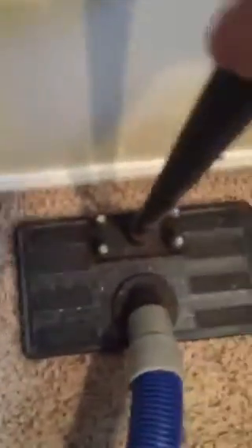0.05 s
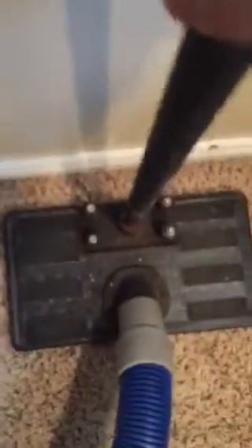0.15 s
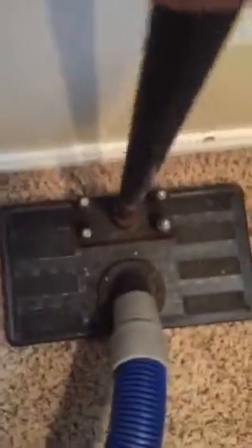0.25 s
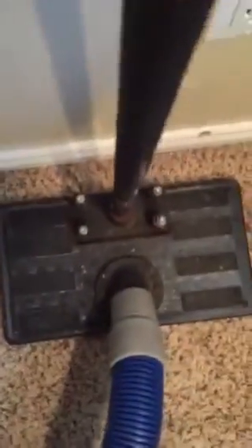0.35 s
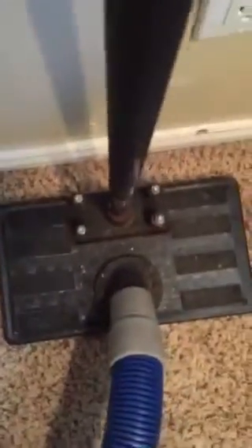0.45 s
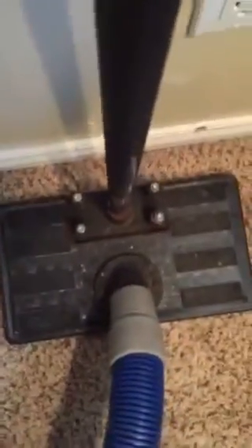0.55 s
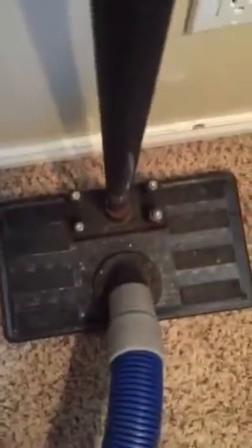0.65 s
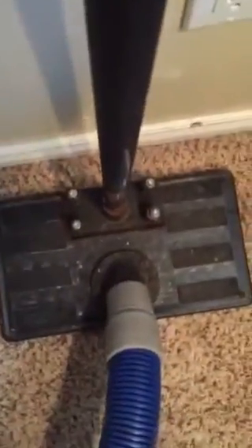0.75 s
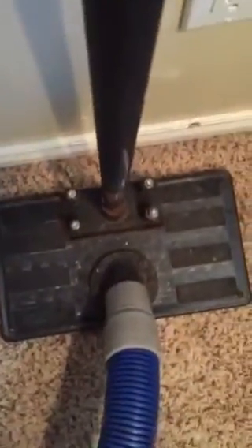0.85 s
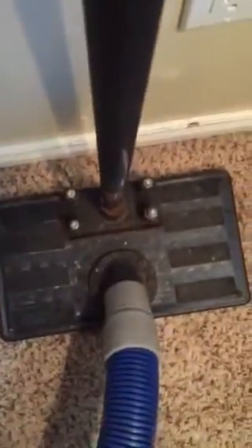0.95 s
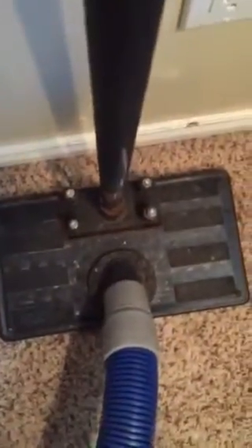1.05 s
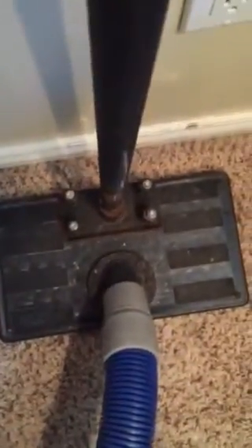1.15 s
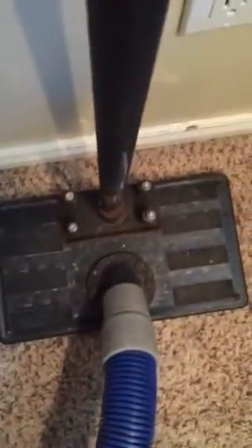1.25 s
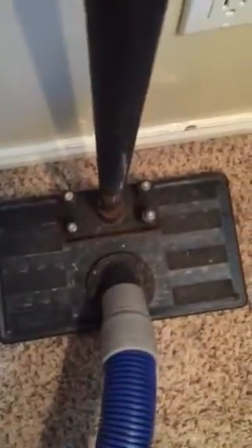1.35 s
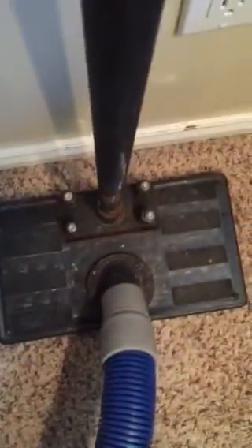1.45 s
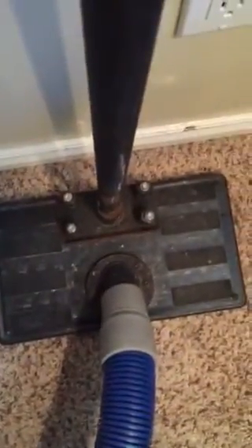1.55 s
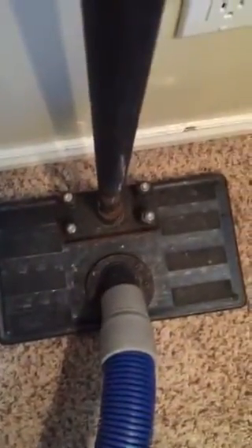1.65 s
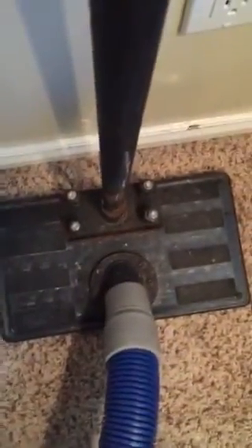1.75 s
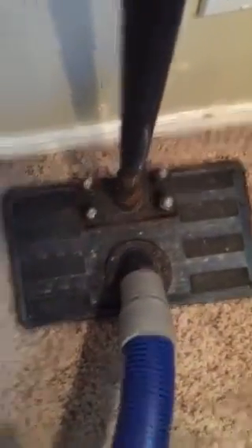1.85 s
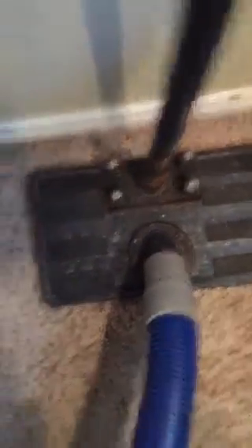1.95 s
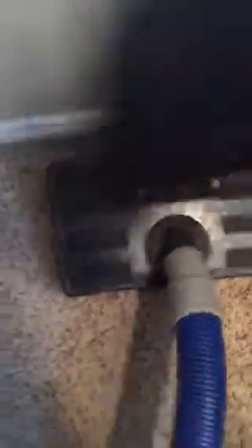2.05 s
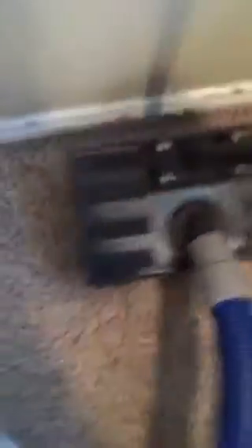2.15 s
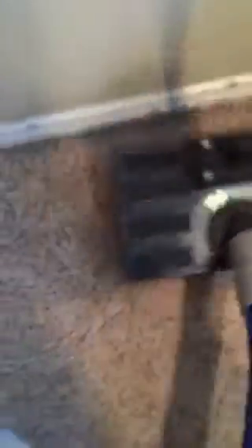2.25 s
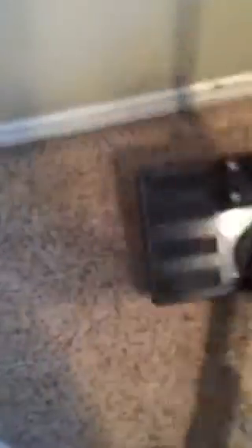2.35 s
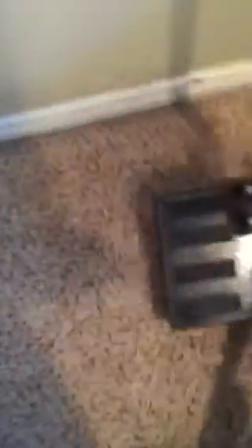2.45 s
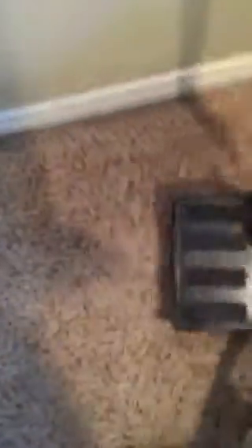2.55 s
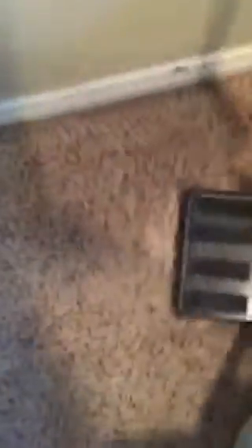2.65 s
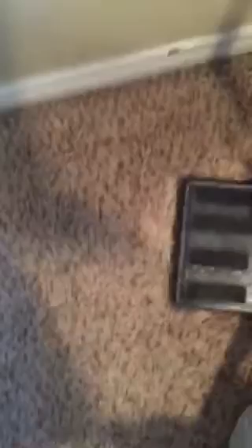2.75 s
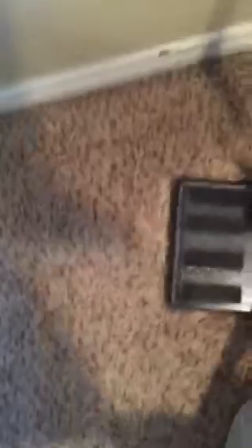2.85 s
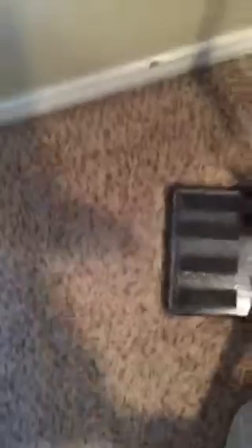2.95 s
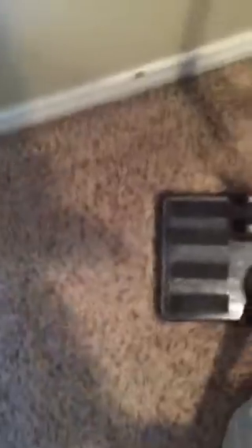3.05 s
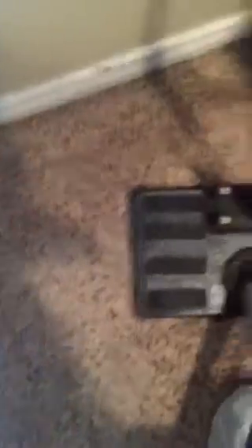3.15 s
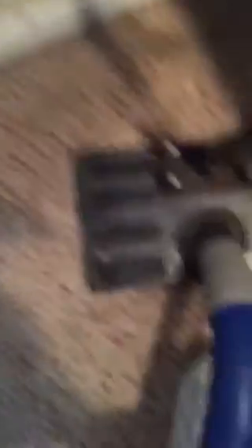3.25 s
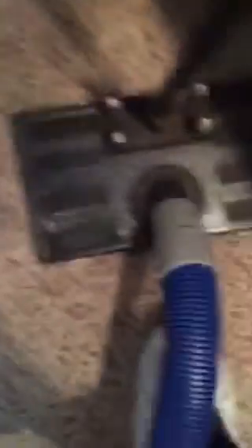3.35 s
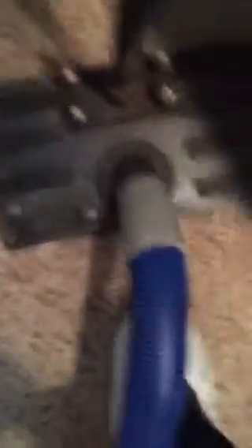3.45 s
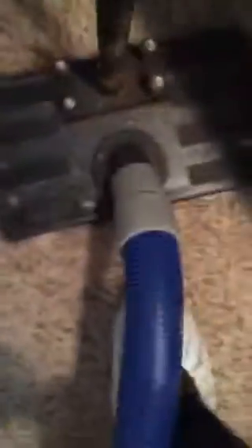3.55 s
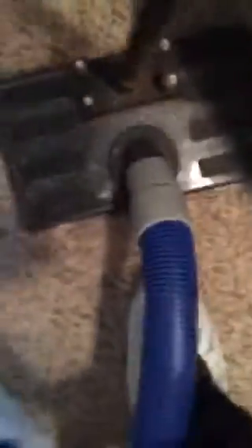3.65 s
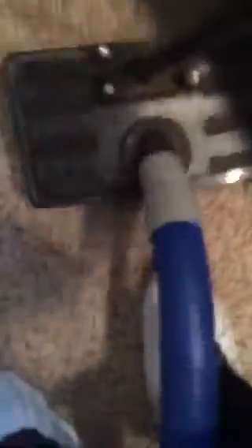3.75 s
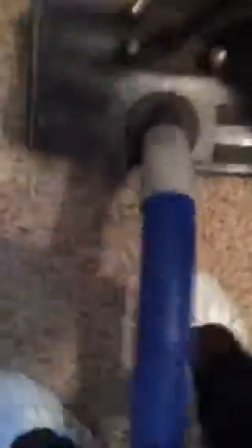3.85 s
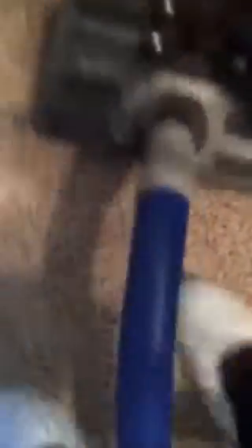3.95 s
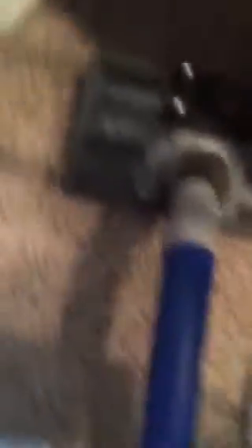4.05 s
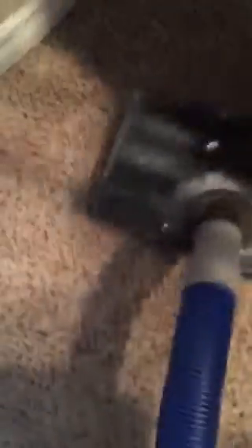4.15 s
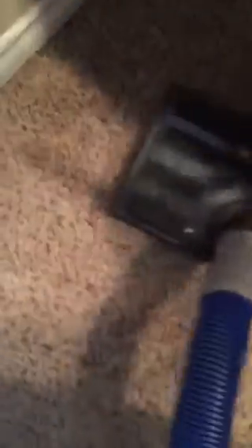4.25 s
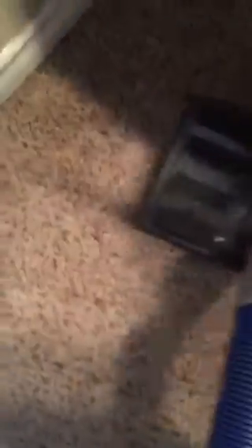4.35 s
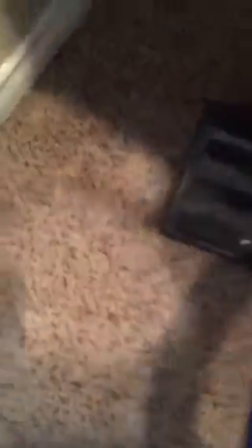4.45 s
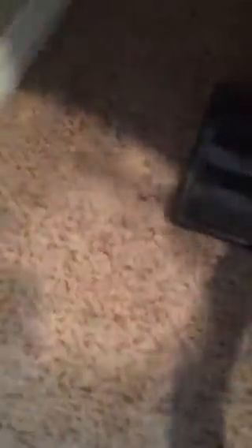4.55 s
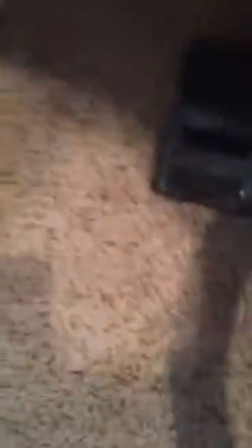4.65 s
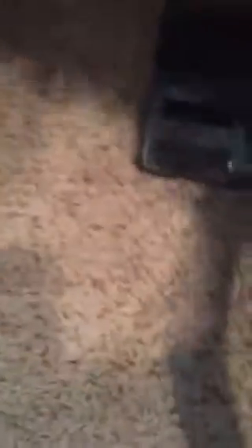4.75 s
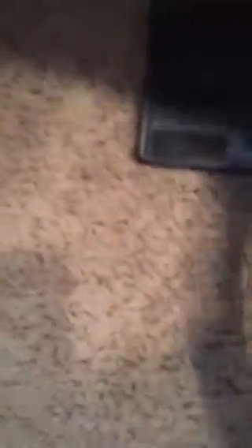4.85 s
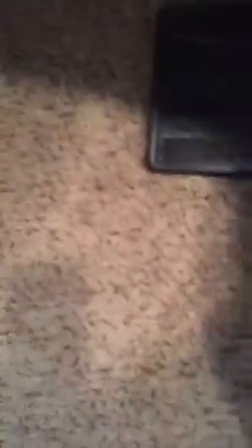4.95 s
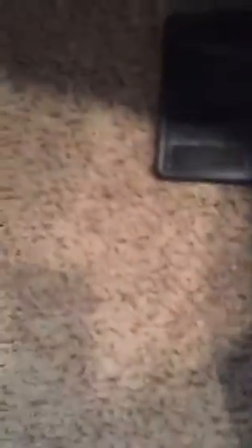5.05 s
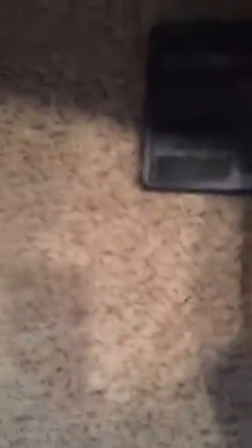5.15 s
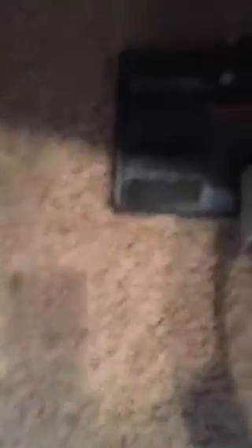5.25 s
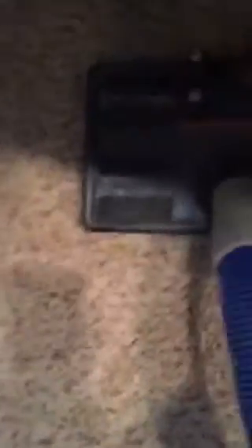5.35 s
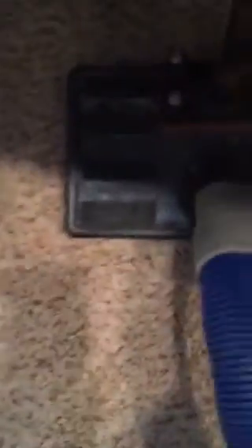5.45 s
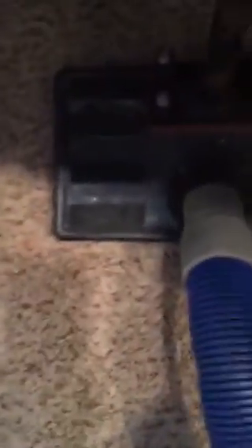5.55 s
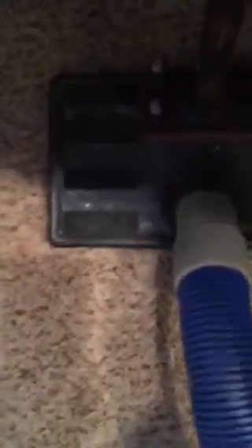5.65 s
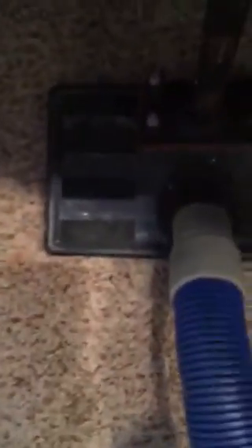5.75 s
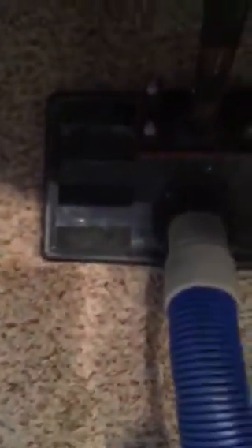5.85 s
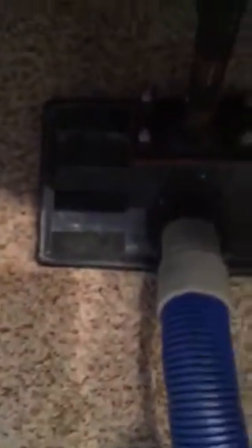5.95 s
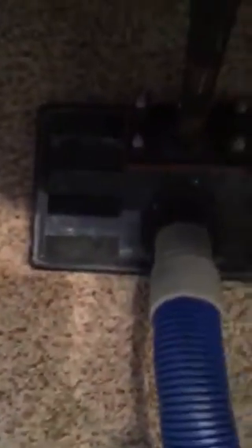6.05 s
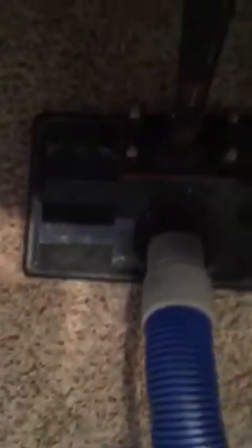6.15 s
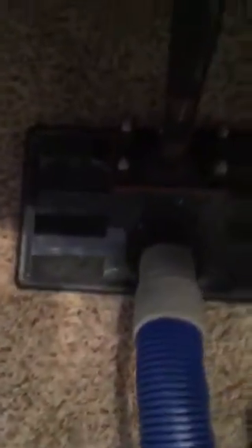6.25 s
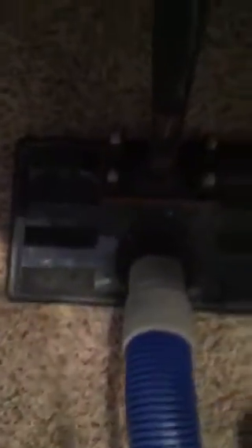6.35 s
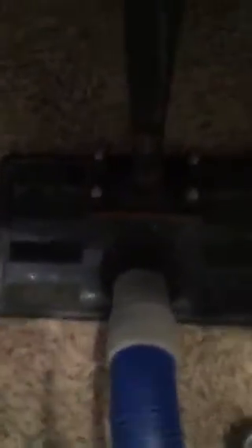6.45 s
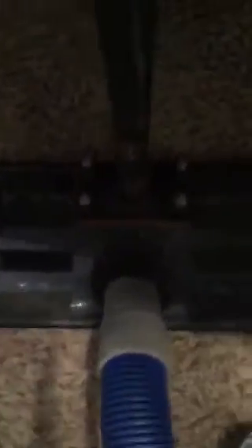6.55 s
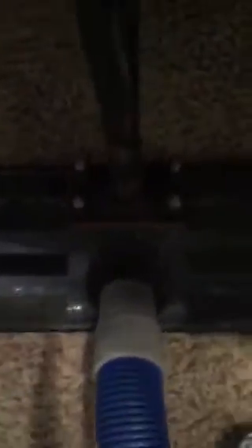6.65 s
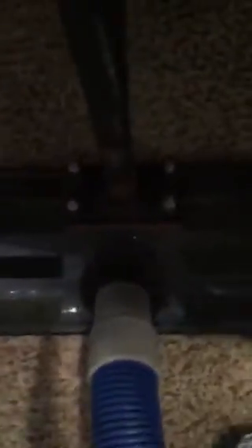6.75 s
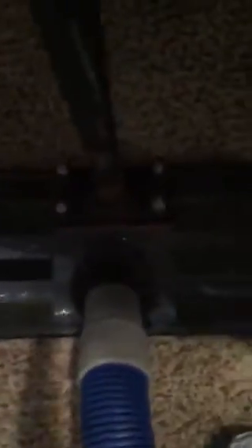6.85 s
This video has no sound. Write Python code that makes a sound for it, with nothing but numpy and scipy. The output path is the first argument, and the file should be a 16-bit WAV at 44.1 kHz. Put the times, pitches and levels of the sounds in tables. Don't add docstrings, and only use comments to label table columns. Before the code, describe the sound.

Close airy suction hiss on wet carpet, two sudden rushes of loud roaring air with plate knocks, each followed by a short rumbling, leaking slide.

```python
import sys
import numpy as np
from scipy import signal
from scipy.fft import rfft, irfft
from scipy.io import wavfile
from scipy.ndimage import uniform_filter1d

SR = 44100
rng = np.random.default_rng(int(sys.argv[2]) if len(sys.argv) > 2 else 0)


def to_wav(sig):
    pcm = np.clip(np.atleast_2d(sig), -1, 1) * 32767
    pcm = np.round(pcm).astype(np.int16)
    wavfile.write(sys.argv[1], SR, pcm.T)


def nominal_scale(level):
    x = np.asarray(level, float) / 20
    return 10 ** x


N = 305172
T = np.arange(N) / SR


def evened(x):
    return x / np.sqrt(np.mean(x ** 2) + 1e-20)


def read(points, hz):
    f, value = np.transpose(points)
    return np.interp(np.log(hz + 1), np.log(f + 1), value)


def bump(hz, centre_hz, width_hz):
    return 1 / (1 + (2 * (hz - centre_hz) / width_hz) ** 2)


def drift(hz, t, count=24):
    rates = np.geomspace(hz / 20, hz, count)
    return evened(sum(np.sin(2 * np.pi * (f * t + rng.random())) / np.sqrt(f) for f in rates))


def air(field_db, size, patchy_db, gust_db, gust_hz):
    overlap = size * 3 // 4
    hz, t, z = signal.stft(rng.standard_normal(N), SR, nperseg=size, noverlap=overlap)
    patches = uniform_filter1d(rng.standard_normal(z.shape), max(round(500 / hz[1]), 1), 0)
    patches = evened(uniform_filter1d(patches, round(.07 / t[1]), 1))
    z = z * nominal_scale(field_db(hz, t) + patchy_db * patches + gust_db * drift(gust_hz, t))
    return signal.istft(z, SR, nperseg=size, noverlap=overlap)[1][:N]


def edged(s, levels, open_s, shut_s):
    levels, drop_db = np.array(levels), -19.5
    times = np.r_[s[0] - abs(open_s), s, s[-1] + abs(shut_s)]
    return times, np.c_[levels[:, :1] + drop_db, levels, levels[:, -1:] + drop_db]


def banded(strokes, spectra, bands):
    def field_db(hz, t):
        out = np.full((len(hz), len(t)), -120.)
        centres = np.log([lo * hi for lo, hi in bands]) / 2
        weights = np.array([np.interp(np.log(hz + 1), centres, one) for one in np.eye(len(bands))])
        for (s, levels), spectrum in zip(strokes, spectra):
            shape = read(spectrum, hz)
            power = nominal_scale(2 * shape)
            held = [10 * np.log10(np.mean(power * (hz >= lo) * (hz < hi))) for lo, hi in bands]
            on = (t >= s[0]) & (t <= s[-1])
            gains = np.array([np.interp(t[on], s, v) - h for v, h in zip(levels, held)])
            out[:, on] = shape[:, None] + weights.T @ gains
        return out
    return field_db


def resonate(x, hz, width_hz):
    turn = np.exp(2j * np.pi * np.cumsum(hz) / SR)
    r = np.exp(-np.pi * width_hz / SR)
    return (turn * signal.lfilter([1], np.convolve([1, -r], [1, -r]), x / turn)).real


def seal():
    # f/Hz, level/dB per Hz
    first_hiss = [(24, -44), (40, -43), (60, -7), (132, -10.5), (446, -20.5), (492, -16), (1750, -14.5),
                  (2030, -8), (2880, -15), (6210, -17), (7970, -22.5), (11600, -15), (15200, -28.5)]
    last_hiss = [(24, -54), (40, -29), (53, -8), (74, -16), (98, -14.5), (258, -25), (315, -15.5),
                 (505, -19), (1180, -15), (1330, -14.5), (3260, -15), (4730, -9), (15200, -22.5)]
    # f/Hz, width/Hz, boost/dB
    first_slots = [(1200, 220, 1), (2050, 140, 4.5), (3200, 110, 8), (4030, 200, 2.5), (4230, 100, -3.5),
                   (4480, 560, 8), (5280, 420, 6.5), (6220, 500, 7), (11700, 530, 5.5), (762, 110, -8),
                   (2900, 260, -5.5), (7500, 710, -3), (9400, 940, -1), (12600, 600, -7)]
    last_slots = [(1176, 190, 8), (1580, 81, 5.5), (2160, 220, 4), (4710, 260, 4), (4100, 200, 4),
                  (5270, 250, 4.5), (6440, 520, 5), (795, 270, -2.5), (12500, 1500, 0.5)]
    seal_db = -35.5, -34.5
    # t/s, share of the last place
    place = [
        (0, 0.3),
        (2.1, 0.27),
        (2.7, 0.83),
        (6.92, 0.77),
    ]
    # t/s, treble loss/dB, recovery/s
    dips = [
        (2.75, -6, .2),
        (4.93, -1, .25),
    ]
    ripple_db, ripple_hz, ripple_top_hz = 1.7, 65, 8000

    def field_db(hz, t):
        places = []
        for spectrum, slots, db in zip((first_hiss, last_hiss), (first_slots, last_slots), seal_db):
            shape = read(spectrum, hz) + sum(boost * bump(hz, f, w) for f, w, boost in slots)
            ripple = evened(uniform_filter1d(rng.standard_normal(len(hz)), round(ripple_hz / hz[1])))
            shape = shape + ripple_db * (hz > 300) / (1 + (hz / ripple_top_hz) ** 4) * ripple
            places.append(shape + db - 10 * np.log10(np.mean(nominal_scale(2 * shape) * (hz > 300))))
        share = np.interp(t, *np.transpose(place))
        dip = sum(db * (t > s) * np.exp(-abs(t - s) / back) for s, db, back in dips)
        treble = hz ** 2 / (hz ** 2 + 6600.0 ** 2)
        return np.outer(treble, dip) + np.outer(places[0], 1 - share) + np.outer(places[1], share)
    return air(field_db, size=2048, patchy_db=0.97, gust_db=0.26, gust_hz=11)


def machine():
    # f/Hz, level at the first place/dB, level at the last place/dB
    hum = [(57, -64, -63), (74.1, -50.5, -51.5), (91, -71, -101), (114, -65, -63.5), (119.8, -55.5, -72),
           (136.8, -49, -63.5), (222, -64.5, -68.5)]
    # t/s, share of the last place, level/dB
    standing = [(0, 0.065, -1), (1.9, 0.02, 0), (2.8, 0.26, 0.5), (3.5, 0.28, 1.5), (4.0, 0.066, -2.5),
                (4.6, 0.15, -6), (5.2, 0.041, -3.5), (5.6, 0.49, 1), (6.0, 0.94, 2), (6.92, 1, 0)]
    s, *columns = np.transpose(standing)
    share, room_db = (np.interp(T, s, c) for c in columns)
    out = np.zeros(N)
    for hz, first_db, last_db in hum:
        waver, wander = (np.interp(T, T[::256], drift(f, T[::256])) for f in (9, 5))
        turns = np.cumsum(hz * (1 + .002 * wander)) / SR + rng.random()
        level_db = first_db + (last_db - first_db) * share + room_db + 0.77 * waver
        out += np.sqrt(2) * nominal_scale(level_db) * np.sin(2 * np.pi * turns)
    return out


def knocks():
    # t/s, peak level/dB, f/Hz, t60/s, sign and strength of the push
    hits = [(2.014, -30, 190, 0.041, 0.87), (2.0295, -19.5, 189, 0.028, 0.93),
            (2.042, -28, 190, .04, -0.95), (2.064, -13, 6100, .004, 1), (2.833, -24, 2400, .004, 1),
            (2.095, -25.5, 150, 0.087, 1), (2.743, -19.5, 1020, 0.037, 0.86), (2.742, -16, 2270, .025, 1),
            (2.751, -12.5, 198, .04, -0.9), (2.7565, -18, 185, 0.023, -0.92), (2.745, -20, 1500, .03, 1),
            (2.752, -21.5, 60, 0.1, -0.95), (2.884, -21, 1450, 0.016, 0.88), (3.656, -20, 165, .05, 0.47),
            (3.721, -16.5, 1410, .012, 1), (3.761, -22, 213, 0.082, 1), (3.781, -28, 65.4, 0.086, 0.92),
            (4.595, -28, 240, 0.16, 0.56), (4.676, -31.5, 61, .15, 1), (4.89, -36, 50, 0.15, 1),
            (4.99, -37, 47.6, .15, 1), (5.052, -28.5, 229, 0.18, 0.6)]
    out, t = np.zeros(N), T[:SR // 4]
    for s, db, hz, t60, sign in hits:
        swing = (1 - np.exp(-3. * hz * t)) * nominal_scale(-60 * t / t60) * np.sin(2 * np.pi * hz * t)
        out[round(s * SR):][:len(t)] += sign * nominal_scale(db) * swing / abs(swing).max()
    return out


def rush():
    # t/s, flow level/dB, lift 0-1, tightness of the jet at the lip 0-1, wetness 0-1
    tears = [
        [(2.05, -38, .6, 0.68, .5), (2.062, -36, 0.74, .8, 0.84), (2.09, -24.5, 0.62, 0.14, 0.65),
         (2.132, -24.5, 0.85, 0.4, 0.8), (2.21, -31, 0.94, 0.8, 0.47), (2.444, -31.5, 0.91, 0.74, 0.45),
         (2.69, -29, 0.76, 0.46, 0.5), (2.72, -22.5, .1, 0, 0.5), (2.748, -24, 0.3, 0.33, 0.15)],
        [(3.712, -25.5, 0.06, 0.94, 0.4), (3.75, -25.5, .3, 0.74, 0.66), (3.766, -21, 0.37, .3, 0.52),
         (3.89, -26, 0.66, 0.64, 0.65), (4.3, -28, 0.76, 0.47, 0.8), (4.59, -24.5, 0.44, 0.21, 0.76),
         (4.7, -22.5, 0.13, 0.04, .3), (4.866, -24, 0.13, 0.25, 0.3), (4.932, -29.5, 0.4, .25, 0)],
    ]
    # f/Hz, level/dB per Hz
    roar = [
        [(24, -65), (40, -35), (60, -34), (135, -4.5), (517, -7), (631, -4.5), (1200, -9), (1430, -8.5), (1930, -7.5), (3340, -8), (5090, -11.5), (12200, -8), (15200, -10.5)],
        [(24, -50), (40, -20), (64, -15), (93, -16), (228, 1.5), (365, -9.5), (544, -2), (697, -2.5), (1150, -2.5), (2670, -1.5), (4850, -7), (11900, -6), (15200, -9)],
    ]
    # from f/Hz, to f/Hz
    bands = (150, 1200), (1200, 4000), (4000, 8000), (8000, 15500)
    # level when low, loose and dry/dB, then dB per lift, per tightness, per wetness
    law = [
        (-14, 15.5, 0.3, 0.1),
        (-10, 0, 20.3, 0.1),
        (-20, 8.2, 18.4, 11.6),
    ]
    # opening/s, shutting/s
    edge_times = [(0.029, 0.017), (0.019, 0.039)]
    # start t/s, end t/s, f/Hz, width/Hz, level/dB
    hollows = [(4.58, 5.0, 390, 80, -18), (4.3, 4.75, 550, 50, -7), (3.95, 4.5, 1150, 140, -5),
               (3.69, 3.77, 710, 400, -6), (4.85, 5.0, 750, 100, -5), (2.2, 2.48, 1230, 180, -6)]
    fade_s = .04
    strokes = []
    for rows, edges in zip(tears, edge_times):
        s, flow, lift, jet, wet = np.transpose(rows)
        boom, hiss, fizz = (flow + db + a * lift + b * jet + c * wet for db, a, b, c in law)
        strokes.append(edged(s, [boom, flow, hiss, fizz], *edges))
    roar_db = banded(strokes, roar, bands)

    def field_db(hz, t):
        out = roar_db(hz, t)
        for start, end, f, width, db in hollows:
            fade = np.clip(np.minimum(t - start, end - t) / fade_s, 0, 1)
            out = out + db * np.outer(bump(hz, f, width), fade)
        return out
    return air(field_db, size=1024, patchy_db=1.3, gust_db=.3, gust_hz=150)


def whistles():
    # start t/s, length/s, from f/Hz, to f/Hz, peak level/dB
    cracks = [(2.049, .04, 6200, 5800, -24.5), (3.703, .056, 4630, 4550, -18.5),
              (3.706, .058, 6100, 5840, -20.5), (3.711, .018, 3550, 3470, -19)]
    opening = [(2.1, 0.11, 1070, 1070, -27), (2.07, .12, 700, 620, -29.5), (2.13, 0.076, 620, 640, -31),
               (2.09, 0.116, 400, 370, -33.5), (2.15, 0.13, 950, 980, -33), (2.1, 0.28, 12000, 11500, -28),
               (2.08, 0.38, 14800, 11900, -19), (3.748, .06, 1650, 1300, -23.5),
               (3.77, .075, 1300, 920, -24), (3.82, .14, 910, 820, -24), (3.8, .11, 1500, 1700, -33),
               (4.45, 0.81, 237, 217, -43.5), (4.45, 0.45, 320, 300, -45.5)]
    closing = [(2.28, .48, 650, 643, -35), (2.44, .33, 1420, 1460, -34.5), (2.25, .3, 2070, 2100, -39),
               (2.62, 0.16, 2450, 2610, -32.5), (3.9, 0.83, 890, 910, -36.5), (4.15, 0.4, 1590, 1900, -33),
               (4.62, 0.28, 2280, 2600, -32), (4.66, 0.23, 3100, 3300, -33), (4.6, 0.29, 1050, 1090, -38),
               (4.55, .38, 4000, 4050, -31), (4.2, 0.52, 488, 480, -39.5), (5.05, 0.85, 224, 240, -55),
               (5.0, 1.24, 306, 311, -58.5)]
    leaks = [(2.89, .1, 5050, 5250, -39), (3.6, .17, 5080, 5230, -35), (3.02, .1, 4380, 4520, -35),
             (3.03, .1, 4300, 4700, -39), (3.13, .12, 4700, 4650, -38), (3.24, .08, 4600, 4640, -33),
             (3.28, .08, 3900, 4400, -38), (3.29, .11, 4450, 4300, -33.5), (3.33, .09, 4200, 4020, -39),
             (3.18, .12, 5050, 5400, -40), (3.4, 0.081, 5080, 4500, -39), (3.43, .09, 4400, 4640, -36),
             (3.4, .07, 6250, 6270, -37), (3.49, .05, 6130, 6120, -39), (3.56, .05, 6800, 6160, -40),
             (3.58, .12, 4300, 4480, -39), (3.05, .12, 6050, 6100, -43), (3.3, .07, 5450, 5470, -44),
             (3.5, 0.18, 4300, 4100, -43), (3.2, 0.17, 6300, 6240, -39), (3.33, .35, 6300, 6100, -43),
             (2.9, .15, 6000, 5150, -44), (4, .17, 4600, 5480, -42), (2.95, .24, 4100, 3800, -41),
             (3.17, .12, 3400, 3920, -44), (2.98, 0.22, 6000, 6100, -44), (2.95, 0.32, 7400, 7800, -47),
             (2.9, .27, 6900, 6500, -50), (4.96, .12, 4550, 4500, -40), (5.04, .11, 4800, 4800, -38),
             (5.07, .08, 4150, 4150, -42), (5.17, .16, 5400, 5150, -38), (5.26, .13, 4520, 4380, -38),
             (5.14, .1, 4750, 4600, -41), (5.23, .2, 6200, 6200, -42)]
    squeak = [(2.831, .021, 1530, 1480, -26.5), (2.839, .02, 2960, 2900, -35),
              (2.859, 0.0072, 2900, 2900, -38)]
    hose = [(3.781, .11, 612, 570, -27), (3.898, 0.076, 641, 620, -32.5), (3.98, .12, 608, 593, -30.5),
            (4.13, .1, 710, 700, -34), (4.212, .13, 698, 710, -29.5), (4.32, .14, 714, 710, -33),
            (4.44, 0.19, 720, 667, -33.5), (4.122, 0.26, 585, 600, -36.5), (3.981, .15, 890, 900, -35.5),
            (4.27, 0.12, 930, 870, -35), (4.42, .1, 880, 900, -37), (4.5, .14, 490, 495, -36),
            (4.529, .1, 630, 620, -34), (4.6, 0.11, 920, 925, -36), (4.76, 0.2, 695, 677, -38.5),
            (4.8, .1, 980, 955, -36), (2.26, 0.11, 620, 640, -36), (2.419, 0.19, 650, 637, -37),
            (4.991, 0.18, 2120, 2080, -37.5), (5.001, .14, 1500, 1600, -42)]
    fuzz = .11, .21, .18, .032, .025, .072
    flutter = 4, 3, 4, 2, .2, 1.5
    # place of the peak 0-1, level at the ends/dB, flatness
    swells = [
        (0.5, -26, 2.6),
        (0.29, -14, 1.5),
        (0.69, -11, 2.3),
        (0.46, -13, 1.4),
        (.4, -23, 14),
        (.5, -13.5, 1.7),
    ]
    widen = .18
    lead = 2048
    out = np.zeros(N)
    kinds = cracks, opening, closing, leaks, squeak, hose
    for rows, share, loose, (top, ends_db, flat) in zip(kinds, fuzz, flutter, swells):
        for s, length, from_hz, to_hz, db in rows:
            u = np.arange(0, length, 1 / SR) / length
            width_hz = share * 2000 * (from_hz * to_hz / 2000 ** 2) ** (.5 + widen / 2)
            pitch = np.pad(from_hz * (to_hz / from_hz) ** u, (lead, 0), "edge")
            ring = resonate(rng.standard_normal(len(pitch)), pitch, width_hz)[lead:]
            held = np.sqrt(abs(uniform_filter1d(ring ** 2, round(loose * SR / width_hz) + 1)) + 1e-20)
            away = np.maximum(1 - u / top, (u - top) / (1 - top))
            out[round(s * SR):][:len(u)] += nominal_scale(db + ends_db * away ** flat) * ring / held
    return out


def slide():
    # t/s, leak level/dB, drag level/dB
    drags = [
        [(2.794, -42, -36), (2.854, -42, -34.5), (2.918, -33.5, -36), (3.1, -33.5, -39.5), (3.254, -36, -41.5),
         (3.418, -37, -46), (3.624, -36, -46), (3.668, -38, -37.5), (3.69, -32, -43)],
        [(4.96, -36, -36), (5.03, -36, -32.5), (5.098, -34, -34), (5.15, -36.5, -34), (5.346, -37, -39.5),
         (5.562, -43, -47), (5.74, -43, -49), (5.9, -45, -56), (6.05, -49, -60)],
    ]
    # f/Hz, level/dB per Hz
    scrape = [
        [(59, -36), (100, -8), (140, 3), (173, -3), (269, -4), (818, -23), (948, -10.5), (1360, -4.5), (3140, -11), (4590, -10.5), (15200, -37)],
        [(59, -36), (100, 11), (222, 4), (572, -14), (800, -17), (1050, -11), (2150, -12.5), (3140, -11.5), (4590, -5.5), (6420, -1.5), (10600, -23), (12300, -12), (15200, -37)],
    ]
    # from f/Hz, to f/Hz
    bands = (150, 500), (900, 3500), (3500, 9000)
    rumble_slope, settle_s = 0.74, 0.029
    strokes = []
    for rows, rumble_db in zip(drags, (-47.5, -51)):
        s, leak, drag = np.transpose(rows)
        rumble = rumble_db + rumble_slope * (drag + 40)
        strokes.append(edged(s, [rumble, drag, leak], settle_s, settle_s))
    return air(banded(strokes, scrape, bands), size=512, patchy_db=1.7, gust_db=.5, gust_hz=60)


def scene():
    return np.tile(seal() + machine() + knocks() + rush() + whistles() + slide(), (2, 1))


def filled(mid, hop=1024, start=137):
    # t/s, first line, last line
    fills = [(.77, 196, 240), (1.77, 196, 240), (2.187, 352, 416), (2.373, 196, 240), (2.512, 384, 480),
             (2.605, 384, 480), (2.605, 544, 608), (3.859, 544, 608), (3.882, 544, 672), (4.068, 320, 384),
             (4.138, 608, 672), (4.207, 320, 384), (4.37, 384, 448), (4.37, 480, 544), (4.509, 320, 384),
             (5.392, 196, 240), (5.6, 448, 512), (6.367, 196, 240)]
    side, n = np.zeros(N), np.arange(2 * hop) + .5
    window = np.sin(np.pi * n / hop / 2)
    for s, first, last in fills:
        at = round((s * SR - start) / hop - 1) * hop + start
        lines = np.cos(np.pi / hop * np.outer(np.arange(first, last) + .5, n + hop / 2)) * window
        strength = np.std(lines @ mid[at:at + 2 * hop])
        side[at:at + 2 * hop] += 2 / hop * strength * rng.standard_normal(last - first) @ lines
    return side


def top_cut(x):
    return signal.sosfilt(signal.butter(12, 15960, fs=SR, output="sos"), x)


def record(dry):
    # f/Hz, level/dB
    microphone = [(20, -22), (45, -8.5), (65, 0), (4600, -0.5), (5000, -2.5), (5400, -1), (9900, -1),
                  (10400, -6.5), (11000, -1.5)]
    # f/Hz, level under the neighbours/dB
    masked = [(3000, -60), (6000, -12), (7400, -4.5), (10000, -5), (12500, -5.5), (13200, -4),
              (15000, -3.5)]
    # f/Hz, level under the neighbours/dB
    thinned = [(3000, -40), (4500, -13), (11000, -8), (12500, -5.5), (13200, -3.5), (15000, -2.5)]
    ceiling, edge_hz = .95, 15280
    hz = np.fft.rfftfreq(N, 1 / SR)
    limited = ceiling * np.tanh(dry[0] / ceiling)
    mono = irfft(rfft(limited) * nominal_scale(read(microphone, hz)), N)

    cell_hz, _, z = signal.stft(mono, SR, nperseg=2048)
    power = uniform_filter1d(abs(z) ** 2, size=3, axis=1)
    cell = uniform_filter1d(power, size=4, axis=0)
    neighbours = uniform_filter1d(power, size=80, axis=0)
    z = z * (cell > neighbours * nominal_scale(read(masked, cell_hz))[:, None] ** 2)
    z = z * (power > neighbours * nominal_scale(read(thinned, cell_hz))[:, None] ** 2)
    kept = signal.istft(z, SR, nperseg=2048)[1][:N]

    edge_db = -np.clip(hz - edge_hz, 0, 200) / 2
    mid = irfft(rfft(kept) * nominal_scale(edge_db), N)
    mix = mid + nominal_scale(-2.5) * np.outer([1, -1], filled(mid))
    return top_cut(mix)


dry = scene()
out = record(dry)
to_wav(out)
```